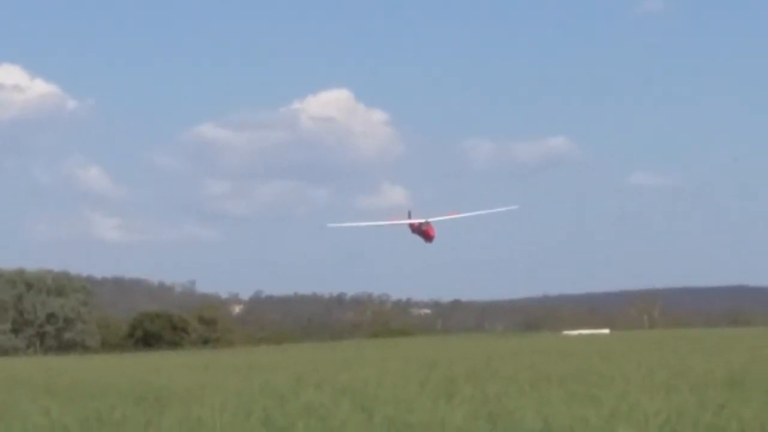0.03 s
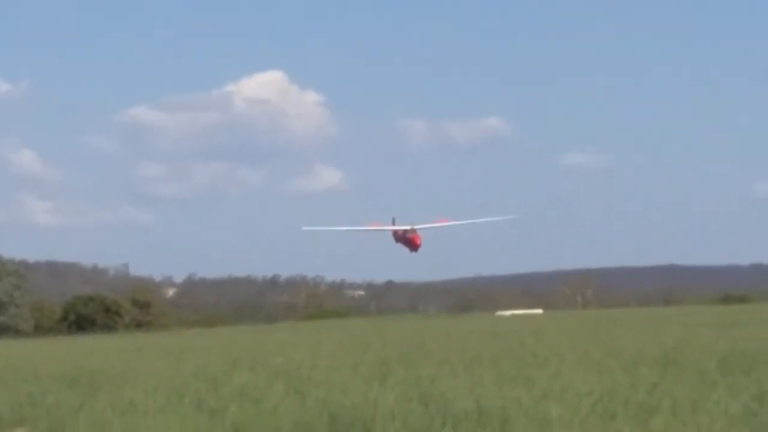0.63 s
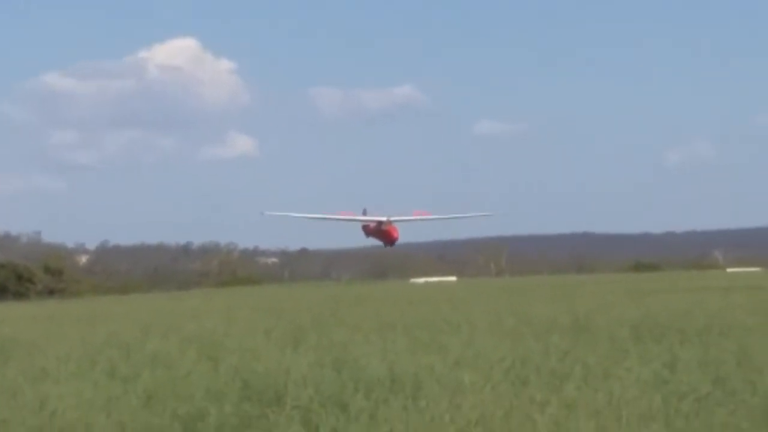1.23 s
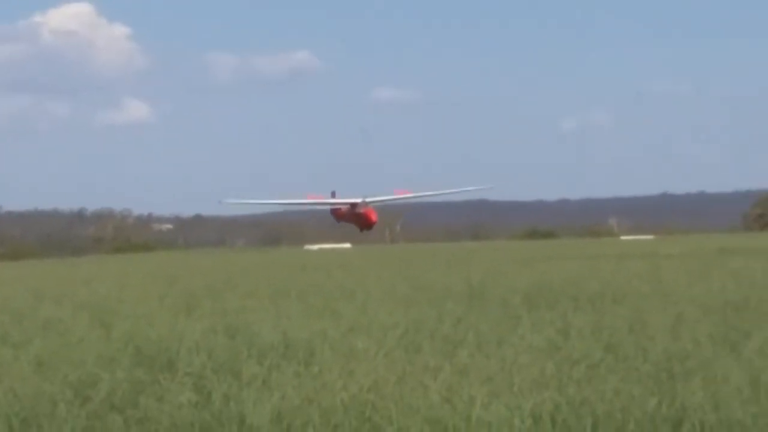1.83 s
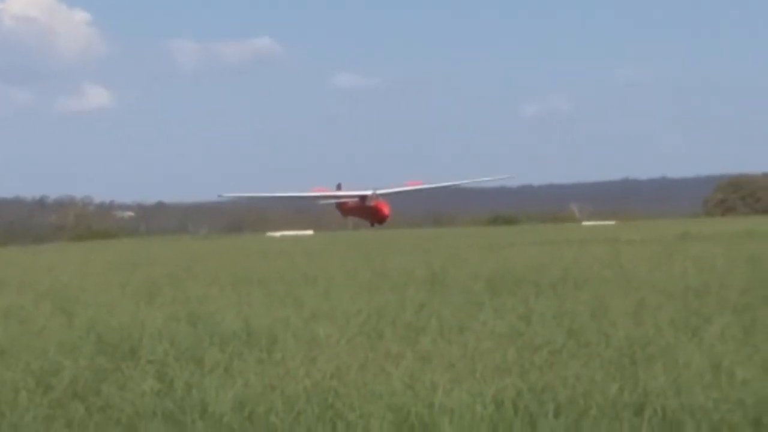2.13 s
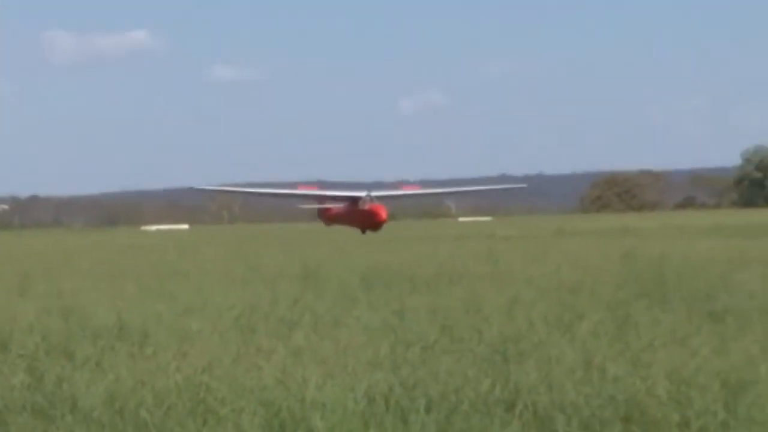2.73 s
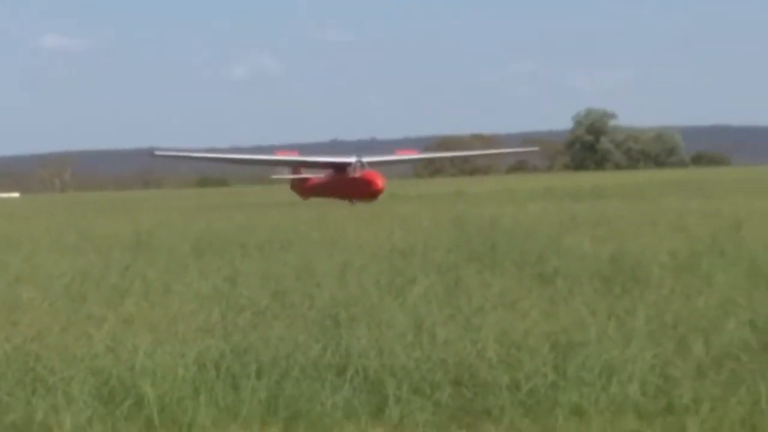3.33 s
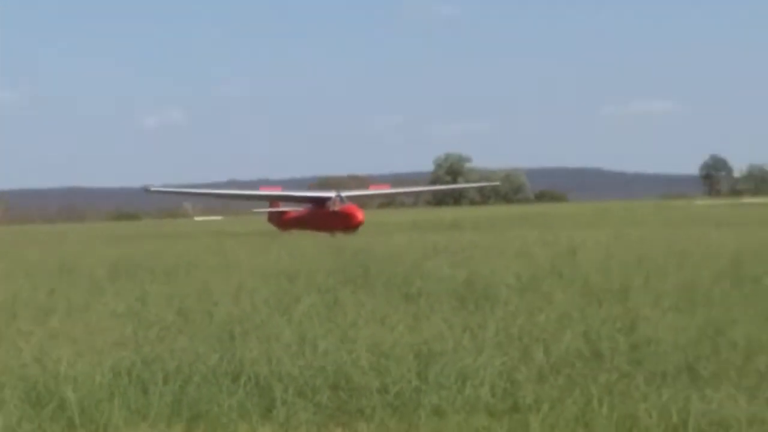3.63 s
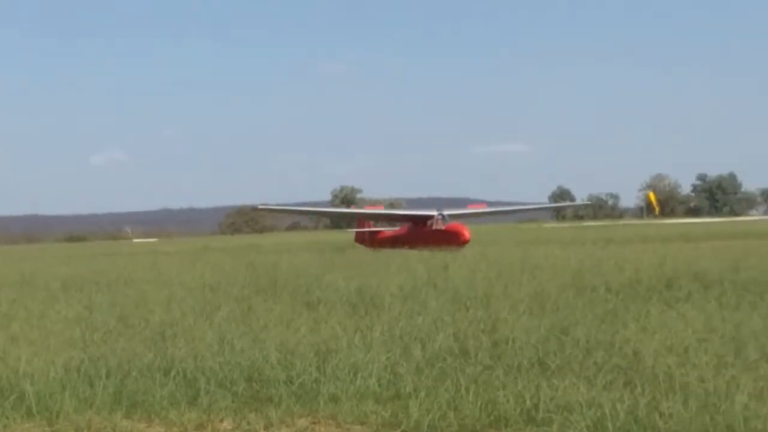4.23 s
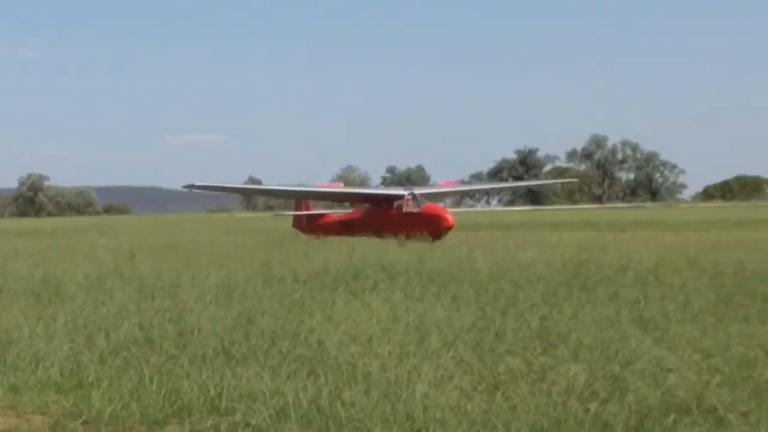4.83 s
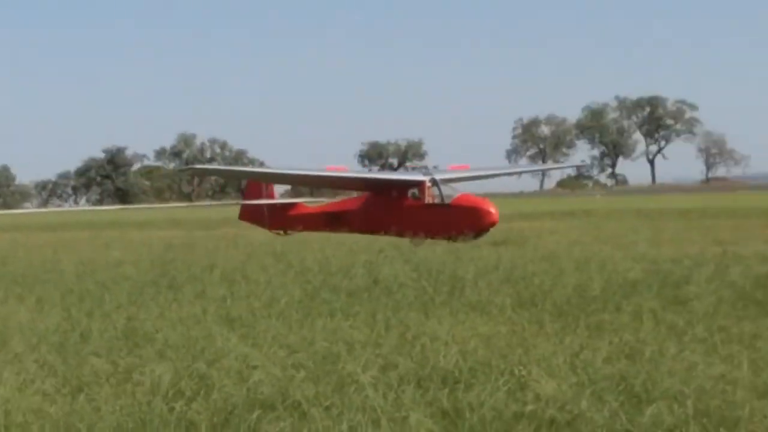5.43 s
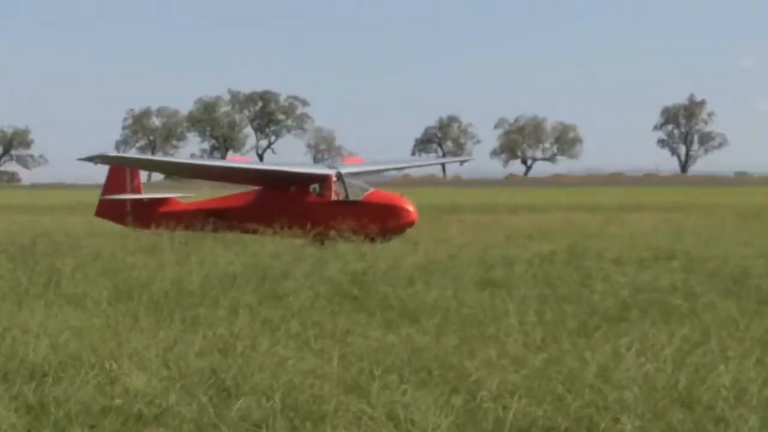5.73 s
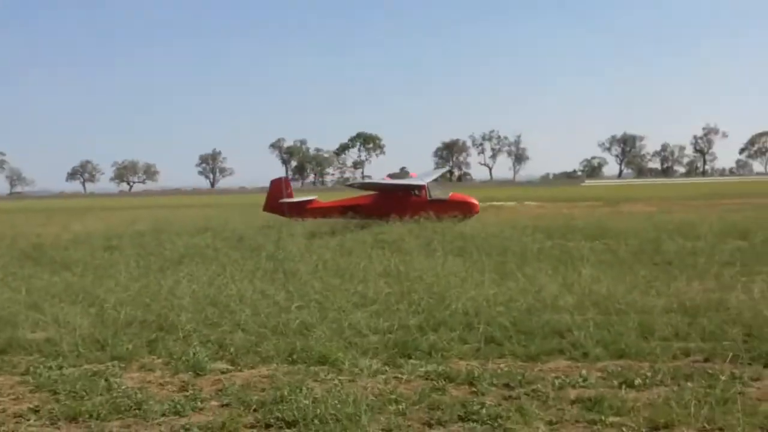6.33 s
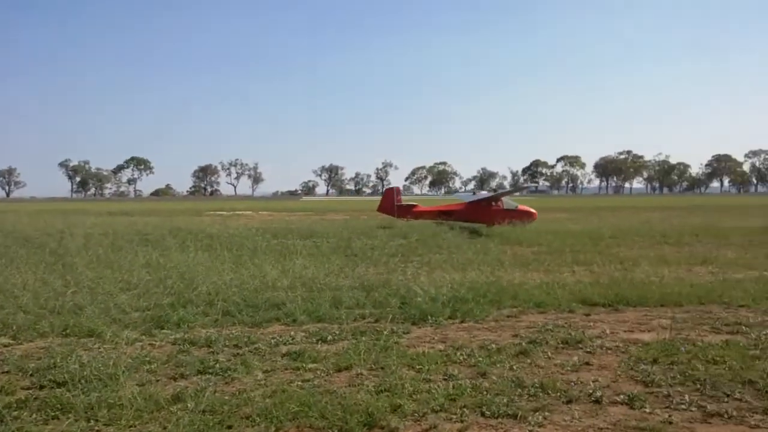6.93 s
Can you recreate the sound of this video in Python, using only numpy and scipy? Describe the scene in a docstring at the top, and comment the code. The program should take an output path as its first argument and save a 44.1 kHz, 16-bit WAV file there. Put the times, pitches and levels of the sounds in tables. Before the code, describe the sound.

From the start, a soft, low camera hum throbs quickly close to the microphone, over faint steady air and light wind in an open field. The hum grows slightly throughout. A tiny dry tick comes at 0.4 seconds and a few more around 3 seconds. From about 3.3 seconds a glider approaches with a faint, thin whirr, then a slowly swelling rush of air and a high hiss, with one tiny rasp near 5 seconds. Grass stalks begin snapping at 5.7 seconds. At 5.9 seconds the glider touches down, by far the loudest part: irregular bumps drum its hollow body, the wheel booms, the skid scrapes and crunches, and grass swishes along the belly as the air rush fades. The bumping eases briefly around 6.3 seconds, surges again from 6.5 to 6.8, and continues with another hard bump near 6.9 seconds.

```python
"""A camera's low hum throbs softly close by, over the steady air of a grass field.
A wooden glider sweeps in: air rushes over its wings and hisses at the air brakes.
It touches down and rolls past. Bumps drum the hollow fuselage, the wheel booms under load,
the skid scrapes and crunches, and stalks swish and snap along the belly."""
import sys
import numpy as np
from scipy import signal
from scipy.fft import rfft, irfft
from scipy.io import wavfile
from scipy.ndimage import uniform_filter1d

SR = 44100
rng = np.random.default_rng(int(sys.argv[2]) if len(sys.argv) > 2 else 0)


def store_pcm(level_fs):
    """Save levels as 16-bit WAV."""
    pcm = np.round(np.clip(level_fs, -1, 1) * 32767).astype(np.int16)
    wavfile.write(sys.argv[1], SR, np.atleast_2d(pcm).T)


N = 307377
TIME = np.arange(N) / SR

# Table levels are relative; each source adds its own gain.
# spectra of steady field air and light wind: f/Hz, level/dB
FIELD_SPECTRUM = [(200, -5), (480, -5), (700, -4.5), (900, -8), (1700, -11), (2500, -13), (3300, -14),
                  (5000, -13), (7000, -16), (15500, -17)]
BREEZE_SPECTRUM = [(25, -8), (52, 12), (75, 3), (110, 13), (200, 3), (270, -5.5), (360, -10.5), (500, -27)]
# pulses within one cycle of the camera's low throbbing hum: t/s, level/dB
HUM_PULSES = [(.0393, 0), (.0568, -10), (.0687, -5), (.0795, -6), (.0979, -4), (.1182, -1.5)]
# envelope of the hum: t/s, level/dB
HUM_LEVELS = [(0.0, -49.5), (2.9, -48), (4.6, -46.5), (5.0, -43.8), (5.7, -43)]
# tone colour of the hum: f/Hz, level/dB
HUM_SPECTRUM = [(30, 5), (60, -1), (100, 0.5), (145, 2.5), (170, -15), (260, -17), (400, -35)]
# airflow up to touchdown: t/s, wing rush/dB, air brake hiss/dB
AIRFLOW_LEVELS = [(1.5, -92, -94), (3.0, -80.5, -91), (3.5, -79.5, -73), (4.1, -72, -72.5),
                  (4.35, -69.5, -65), (4.6, -64.5, -68.5), (4.76, -62.5, -61.5), (5.1, -61, -64),
                  (5.87, -59, -61.5)]
# spectra of wing rush, air brakes, buffeting and fine hiss: f/Hz, level/dB
WING_SPECTRUM = [(300, -24), (450, -6), (620, 0.5), (870, -5), (1100, 0), (1350, -1.5), (1700, -2),
                 (2200, -2), (2700, -10), (3300, -18.5), (4400, -29)]
BRAKE_SPECTRUM = [(3000, -20), (3800, -10), (4400, 0.5), (5400, -4), (6500, -13.5), (8000, -21),
                  (9500, -16), (12000, -36), (16000, -30)]
BUFFET_SPECTRUM = [(25, -14), (50, -4), (75, -6), (105, 8), (160, 5.5), (220, 3), (300, -2.5), (400, -14),
                   (600, -23)]
FINE_HISS_SPECTRUM = [(2500, 6.5), (5000, -6), (15500, 1)]
# thin whirr and rasping chirp on the approach: t/s, length/s, level/dB
WHIRR_EVENTS = [(3.33, 0.64, -72)]
CHIRP_EVENTS = [(4.937, 0.0084, -47)]
# their spectra: f/Hz, level/dB
WHIRR_SPECTRUM = [(4800, -17), (5500, 3), (6100, -10), (6900, -3), (8200, -10), (9400, -5), (10500, -13)]
CHIRP_SPECTRUM = [(2500, -30), (3400, -5), (3900, 3.5), (4500, -2), (5600, -19), (7000, -6.5), (8500, -24),
                  (12000, -35)]
# tall tufts along the belly: t/s, length/s, stalks/dB, tips/dB
GRASS_TUFTS = [(5.77, 0.135, -62.5, -64), (5.92, .18, -54.5, -59), (5.957, 0.052, -54, -52),
               (6.06, 0.0071, -66, -52), (6.288, 0.098, -56, -61), (6.331, 0.023, -59, -52),
               (6.525, 0.21, -56.5, -70)]
# spectra of swishing stalks and whipping tips: f/Hz, level/dB
STALK_SPECTRUM = [(1650, -2.5), (2800, -5.5), (3650, -10.5), (4260, 1.5), (5360, -0.5), (5740, 0.5),
                  (7770, -26), (9000, -14), (11700, -23), (19800, -120)]
TIP_SPECTRUM = [(3000, 2), (4500, 1), (6000, 1), (7100, 7), (7700, 1), (8500, -25), (9600, -10.5),
                (11500, -26), (15000, -27)]
# dry ticks and snapping stalks: t/s, level/dB, f/Hz, decay/s
STALK_SNAPS = [(.4148, -46, 4050, .0018), (3.041, -51, 3800, .002), (3.1336, -48.5, 4200, .002),
               (3.1865, -47, 4500, .0008), (3.3712, -40, 4300, .0006), (4.1212, -48.5, 4200, .0025),
               (5.692, -32.5, 4300, .0008), (5.7128, -37, 4700, .004), (5.7212, -37, 4900, .005),
               (5.741, -39, 4300, .002), (5.7698, -39, 4900, .004), (5.7757, -33, 4400, .002),
               (5.9168, -32, 4200, .002), (5.972, -30, 4400, .0025), (6.0088, -31, 4700, .001),
               (6.063, -34, 4400, .0015), (6.2803, -35, 4500, .0025), (6.3064, -30, 2250, .0025),
               (6.3802, -36, 5300, .003), (6.8376, -38, 4400, .0015)]
# skid coming down on the turf: t/s, length/s, skid/dB, wheel/dB
TURF_CONTACTS = [(5.945, .11, -43, -32.5), (6.516, 0.23, -45, -31), (6.936, .06, -44, -27)]
# spectra of skid scrape and wheel boom: f/Hz, level/dB
SKID_SPECTRUM = [(210, -18), (350, 5), (381, -4), (431, 1.5), (466, -3), (631, -7.5), (708, -7),
                 (778, -9.5), (898, -12), (997, -6.5), (1140, -5), (1310, -12), (1760, -14), (2030, -13.5),
                 (3400, -23.5), (4420, -39), (7480, -120)]
WHEEL_SPECTRUM = [(25, -49), (45, -20), (65, -10), (95, 1.5), (112, -3), (135, -3), (165, -7.5), (220, -8),
                  (400, -56)]
# midrange ringing that colours the skid's crunch: f/Hz, width/Hz, level/dB
CRUNCH_COLOUR = [(1113, 140, -1.5), (1550, 290, -5.5), (1764, 55, -0.5), (2150, 260, -14)]
# modes of the hollow fuselage: f/Hz, width/Hz, level/dB
FUSELAGE_MODES = [(163, 37, -8.5), (208.2, 15.9, 2), (225.5, 22, 2.5), (248.8, 29.8, 0), (295, 33, -9),
                  (313, 43, -15), (441.4, 15, -22.5), (499, 33, -27.5), (624, 59, -29)]
# hard bumps under the wheel: t/s, level/dB
WHEEL_BUMPS = [(5.957, -22), (6.006, -18.5), (6.034, -16.5), (6.153, -21), (6.295, -30), (6.355, -27.5),
               (6.442, -22.5), (6.494, -17), (6.549, -18.5), (6.593, -14.5), (6.694, -18), (6.746, -22),
               (6.921, -16.5)]

TOUCHDOWN_S, BITE_S, LIFT_S = 5.92, 0.023, 0.073


def from_db(db):
    return 10 ** (np.asarray(db) / 20)


def rms_one(x):
    return x / np.sqrt(np.mean(x ** 2) + 1e-20)


def colour(x, spectrum):
    """Shapes x on a log-frequency axis, -36 dB/octave past the ends; rms 1."""
    hz, db = np.transpose(spectrum)
    bins_hz = np.maximum(np.arange(N // 2 + 1) * SR / N, 1)
    octaves_out = np.log2(np.maximum(hz[0] / bins_hz, 1) * np.maximum(bins_hz / hz[-1], 1))
    shape = from_db(np.interp(np.log(bins_hz), np.log(hz), db) - 36 * octaves_out)
    return rms_one(irfft(rfft(x) * shape, N))


def noise(spectrum):
    return colour(rng.standard_normal(N), spectrum)


def grains(per_s, spread_db):
    """Random contacts, mostly small, a few large; rms 1."""
    sizes = from_db(spread_db * np.minimum(rng.exponential(1, N), 4)) * rng.choice([-1, 1], N)
    return rms_one(sizes * (rng.random(N) < per_s / SR))


def even(x, span_s):
    """Holds the slow level at 1, keeps the fast grain."""
    return x / np.sqrt(np.maximum(uniform_filter1d(x ** 2, int(span_s * SR)), 1e-12))


def resonate(x, hz, width_hz):
    """Two-pole resonance, peak gain 1."""
    r = np.exp(-np.pi * width_hz / SR)
    feedback = [1, -2 * r * np.cos(2 * np.pi * hz / SR), r * r]
    return signal.lfilter(np.array([1, 0, -1]) * (1 - r * r) / 2, feedback, x + 1e-18)


def ring_modes(force, modes):
    """Parallel resonances, alternating in sign."""
    return sum((-1) ** k * from_db(db) * resonate(force, hz, width_hz)
               for k, (hz, width_hz, db) in enumerate(modes))


def swells(events, rise_s, fall_s, sag_db_per_s=0):
    """Gain of events (t/s, length/s, level/dB) that rise, hold or sag, and fall; powers add."""
    steps_s = TIME[::16]
    power = 0
    for start_s, length_s, db in events:
        age_s = steps_s - start_s
        edges = np.maximum(-age_s, 0) / rise_s + np.maximum(age_s - length_s, 0) / fall_s
        held = from_db(db - sag_db_per_s * np.clip(age_s, 0, length_s))
        power = power + (held * np.exp(-edges)) ** 2
    return np.interp(TIME, steps_s, np.sqrt(power + 1e-20))


def rolling(db):
    """Steady gain from touchdown on."""
    return swells([(TOUCHDOWN_S, N / SR, db)], BITE_S, LIFT_S)


def field_air():
    """Steady open air and light wind."""
    return from_db(-64) * noise(FIELD_SPECTRUM) + from_db(-62.5) * noise(BREEZE_SPECTRUM)


def camera_hum(cycle_s=0.12003, jitter_s=0.00049, spread_db=1.17, centre_hz=105, width_hz=55):
    """Uneven pulses recur each cycle, filtered to a low throb."""
    offsets_s, db = np.transpose(HUM_PULSES)
    run_in = int(cycle_s * SR)
    cycles_s = np.arange(0, (N + run_in) / SR, cycle_s)
    cycles_s += jitter_s * uniform_filter1d(rng.standard_normal(len(cycles_s)), size=5)
    at = ((cycles_s[:, None] + offsets_s) * SR).astype(int)
    pulses = np.zeros(N + SR)
    pulses[at] = -from_db(db + spread_db * rng.standard_normal(at.shape))
    hum = resonate(resonate(pulses, centre_hz, width_hz), centre_hz, width_hz)
    throb = colour(hum[run_in:run_in + N], HUM_SPECTRUM)
    return throb * from_db(0.17 + np.interp(TIME, *np.transpose(HUM_LEVELS)))


def chirp():
    """One short, high rasp."""
    return swells(CHIRP_EVENTS, rise_s=0.0044, fall_s=0.007) * noise(CHIRP_SPECTRUM)


def whirr():
    """Thin, grainy whirr, high and faint, for a moment on the approach."""
    rustle = colour(grains(per_s=5000, spread_db=5.5), WHIRR_SPECTRUM)
    return swells(WHIRR_EVENTS, rise_s=0.13, fall_s=0.17) * rustle


def airflow(speed_m_per_s=13.35, closest_m=15.7, pass_s=6.37, spill_s=0.33):
    """Air over the airframe swells on approach; all but the fine hiss dies as the lift spills."""
    nearness = closest_m / np.hypot(closest_m, speed_m_per_s * (TIME - pass_s))
    lift = np.exp(-np.maximum(TIME - TOUCHDOWN_S, 0) / spill_s)
    t_s, wing_db, brake_db = np.transpose(AIRFLOW_LEVELS)
    wings = from_db(2.5 + np.interp(TIME, t_s, wing_db)) * noise(WING_SPECTRUM)
    brakes = from_db(np.interp(TIME, t_s, brake_db)) * noise(BRAKE_SPECTRUM)
    buffet = from_db(-46) * nearness ** 1.42 * noise(BUFFET_SPECTRUM)
    fine_hiss = from_db(-63.5) * nearness ** 1.3 * noise(FINE_HISS_SPECTRUM)
    return lift * (wings + brakes + buffet) + fine_hiss


def grass(rise_s=0.007, fall_s=0.011):
    """Short grass brushes the belly; in each tuft stalks swish and tips whip."""
    swish = swells([(t_s, length_s, db) for t_s, length_s, db, _ in GRASS_TUFTS], rise_s, fall_s)
    whip = swells([(t_s, length_s, db) for t_s, length_s, _, db in GRASS_TUFTS], rise_s, fall_s)
    stalks = np.hypot(rolling(db=-57.5), swish) * colour(grains(per_s=6400, spread_db=5), STALK_SPECTRUM)
    tips = np.hypot(rolling(db=-65), whip) * colour(grains(per_s=7000, spread_db=5), TIP_SPECTRUM)
    return from_db(2.5) * stalks + from_db(0.5) * tips


def snaps(width_hz=1400, crisp_s=0.00062, dulling_db_per_doubling=9):
    """Stalks snap in tiny ringing bursts; the shorter the decay, the more bright crack."""
    out, age_s = np.zeros(N), TIME[:SR // 40]
    crack_band = signal.butter(3, [6000, 10000], "band", fs=SR, output="sos")
    for t_s, db, hz, decay_s in STALK_SNAPS:
        burst = rng.standard_normal(len(age_s)) * np.exp(-age_s / decay_s)
        ring = resonate(resonate(burst, hz, width_hz), hz, width_hz)
        crack_db = -dulling_db_per_doubling * np.log2(decay_s / crisp_s)
        snap = rms_one(ring) + from_db(crack_db) * rms_one(signal.sosfilt(crack_band, burst))
        start = int(t_s * SR)
        out[start:start + len(snap)] += from_db(db) * snap / np.abs(snap).max()
    return from_db(-0.5) * out


def skid(ease_db_per_s=22.5, hard_db=-43):
    """The skid drags, bites at each contact and eases; crunch grows faster than scrape."""
    bites = [(t_s, length_s, db) for t_s, length_s, db, _ in TURF_CONTACTS]
    pressure = np.hypot(rolling(db=-55.5), swells(bites, BITE_S, LIFT_S, ease_db_per_s))
    grit = colour(grains(per_s=3000, spread_db=1.5), SKID_SPECTRUM)
    ringing = ring_modes(grains(per_s=260, spread_db=2), CRUNCH_COLOUR)
    scrape = from_db(1.5) * even(grit, span_s=0.081)
    crunch = from_db(-3.5) * np.sqrt(pressure / from_db(hard_db)) * even(ringing, span_s=0.048)
    return pressure * (scrape + crunch)


def wheel_boom(lag_s=0.071):
    """The wheel booms under load, taking it after the skid and keeping it longer."""
    loads = [(t_s + lag_s, length_s, db) for t_s, length_s, _, db in TURF_CONTACTS]
    weight = np.hypot(rolling(db=-42), swells(loads, rise_s=0.059, fall_s=0.12))
    return from_db(-0.5) * weight * even(noise(WHEEL_SPECTRUM), span_s=0.044)


def fuselage_drumming(shudder_db=-9, hold_s=0.013):
    """Rough turf drums the hollow body, which shudders after each bump."""
    shudders = [(t_s, hold_s, db + shudder_db) for t_s, db in WHEEL_BUMPS]
    gain = np.hypot(rolling(db=-43.5), swells(shudders, rise_s=0.011, fall_s=0.062))
    body = ring_modes(grains(per_s=900, spread_db=1), FUSELAGE_MODES)
    return from_db(-1.5) * gain * even(body, span_s=0.034)


def fuselage_knocks():
    """Each hard bump is one impulse into all body modes."""
    force = np.zeros(N)
    for t_s, db in WHEEL_BUMPS:
        force[int(t_s * SR)] = from_db(db)
    unit_peak = np.abs(ring_modes(signal.unit_impulse(SR), FUSELAGE_MODES)).max()
    return from_db(-8.5) * ring_modes(force, FUSELAGE_MODES) / unit_peak


def scene():
    """Background, approach and ground run; mono."""
    background = field_air() + camera_hum()
    approach = chirp() + whirr() + airflow()
    ground_run = grass() + snaps() + skid() + wheel_boom() + fuselage_drumming() + fuselage_knocks()
    return (background + approach + ground_run)[None]


def record(dry):
    """Steep low-pass."""
    cutoff_hz = 15800
    return signal.sosfilt(signal.ellip(12, 0.1, 80, cutoff_hz, fs=SR, output="sos"), dry)


dry = scene()
out = record(dry)
store_pcm(out)
```